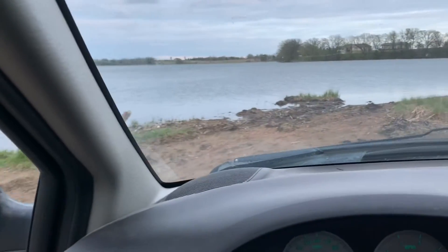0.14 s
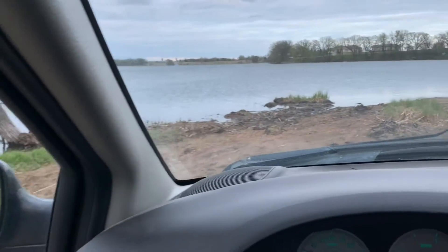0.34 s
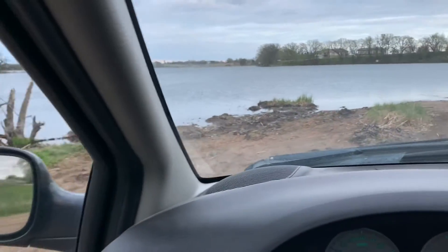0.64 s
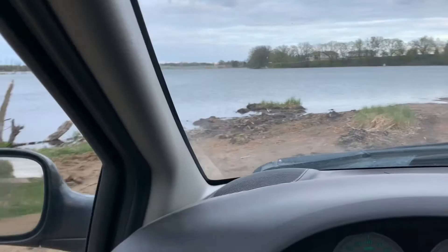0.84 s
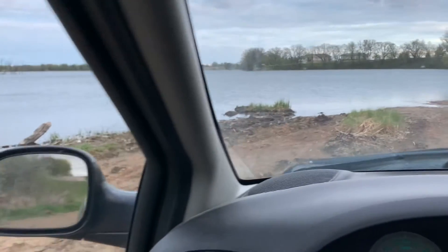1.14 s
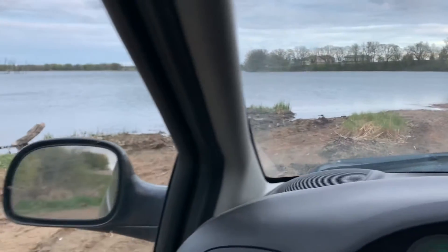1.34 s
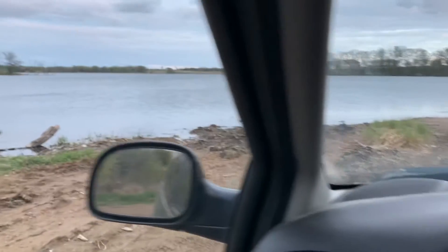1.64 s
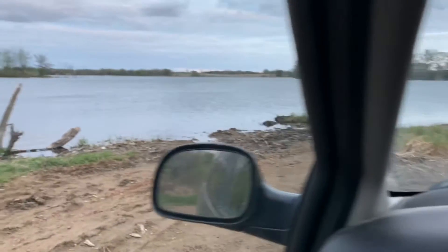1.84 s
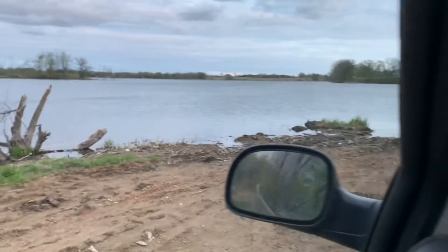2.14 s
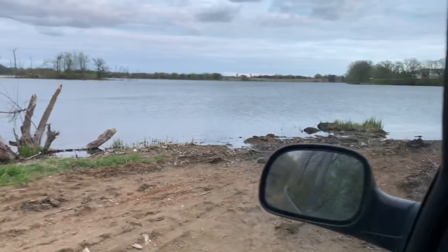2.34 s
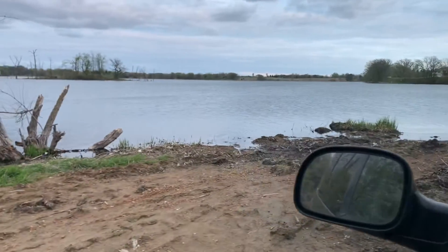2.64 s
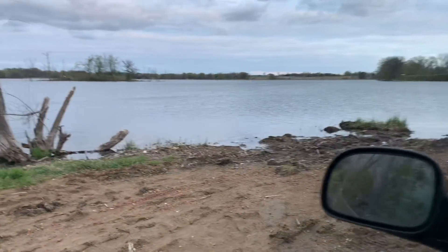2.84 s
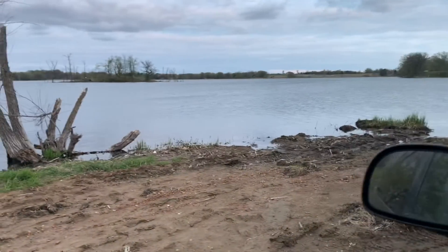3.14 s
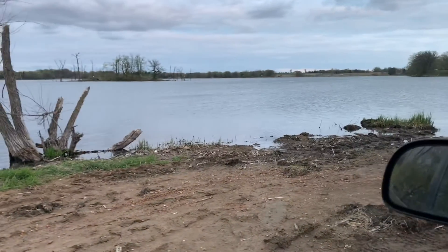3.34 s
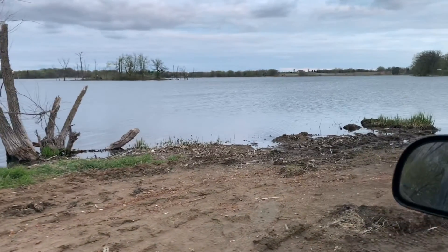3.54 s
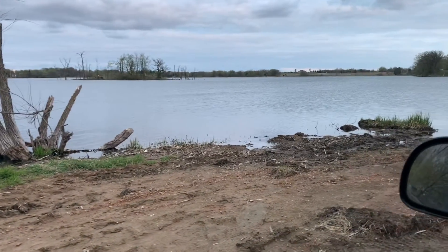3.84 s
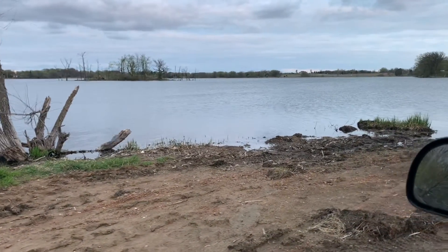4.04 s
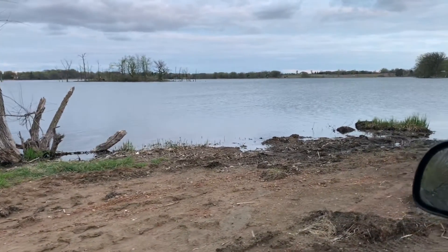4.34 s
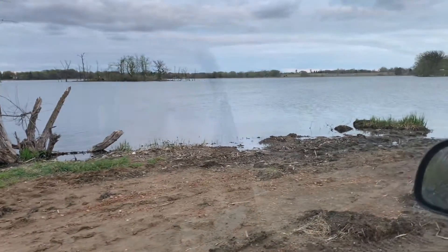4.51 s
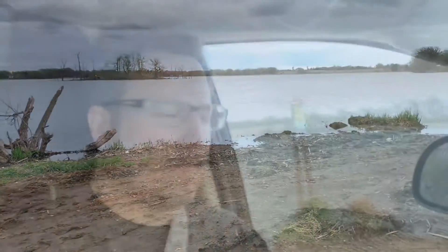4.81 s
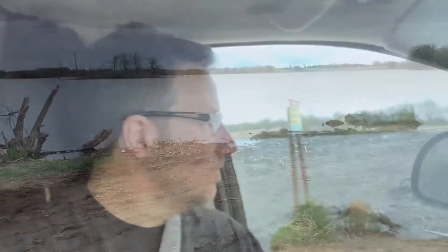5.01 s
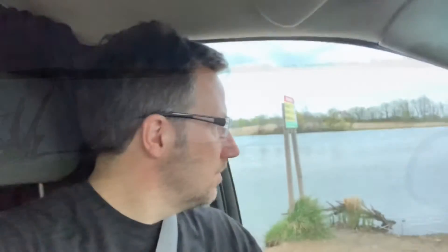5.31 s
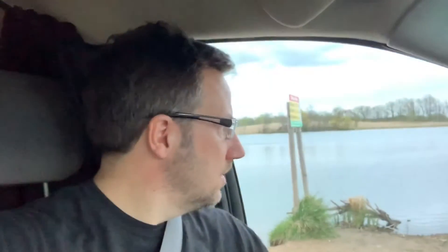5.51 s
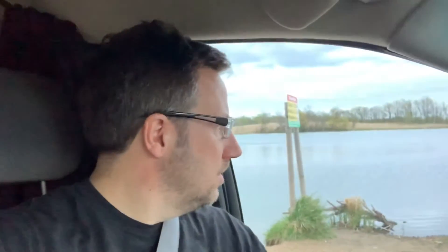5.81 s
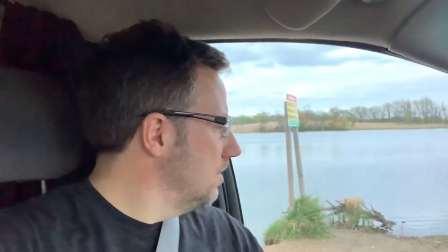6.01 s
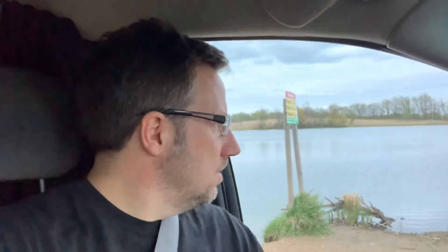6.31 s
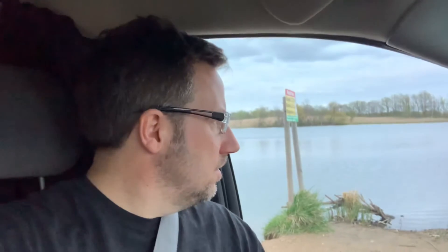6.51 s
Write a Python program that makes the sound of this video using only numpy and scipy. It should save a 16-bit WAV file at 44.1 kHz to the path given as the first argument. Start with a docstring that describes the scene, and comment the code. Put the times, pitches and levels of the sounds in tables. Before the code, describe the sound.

A low engine throb and muffled tyre crunch fill the cabin of a slowly rolling van, with dull knocks from ruts and small ticks of stones and fittings. A hand slides softly over the steering wheel several times. Near the end the driving dies away, leaving a faint hum, a soft rub, a single sharp plastic scrape and slow seat creaking, all heard from inside.

```python
"""Inside a minivan creeping over dirt and gravel. From the start the engine throbs, the tyres rumble and
crunch, and ruts knock the body and shake the trim. From about one second in, the steering wheel hisses through
the driver's palm in short strokes. Near five seconds the scene changes: the rumble fades out, a quiet hum
rises, and something soft brushes past. The seat starts to creak, hard plastic skids in one sharp scrape, and
the seat creaks slowly on to the end."""
import sys
import numpy as np
from scipy import signal
from scipy.fft import rfft, irfft, next_fast_len
from scipy.io import wavfile
from scipy.ndimage import uniform_filter1d

SR = 44100
rng = np.random.default_rng(int(sys.argv[2]) if len(sys.argv) > 2 else 0)


def dump(signal):
    """Clip the signal to [-1, 1] and save it as 16-bit WAV at the path in sys.argv[1]."""
    limited = np.clip(np.atleast_2d(signal).T, -1, 1)
    pcm = np.round(limited * 32767).astype(np.int16)
    wavfile.write(sys.argv[1], SR, pcm)


N = 293697
T = np.arange(N) / SR

# How loud the rolling is over time: time_s, rumble_db, crunch_db
ROLLING = [(0, -40, -59), (.9, -46.5, -58.5), (1.6, -41.5, -58.5), (2.5, -45, -58), (3.2, -43, -59),
           (3.6, -46, -60.5), (3.73, -40, -58), (4.05, -42.5, -61.5), (4.3, -41, -60.5),
           (4.95, -49.5, -66.5), (5.5, -70, -86)]
# Tone of the floor's rumble and of the dirt's crunch: pitch_hz, level_db
RUMBLE_TONE = [(28, -10.5), (40, 2.5), (65, 0), (95, -2.5), (125, -5), (168, -7), (215, -9), (250, -16.5),
               (286, -21), (335, -26), (450, -40)]
CRUNCH_TONE = [(280, 7.5), (400, 0), (520, -0.5), (650, -9.5), (770, -8), (1000, -16), (1400, -26),
               (2000, -34.5), (3000, -34.5), (5000, -42)]
def tyres(rumble_gain_db=3):
    """The ground shakes the floor; dirt grinds unevenly under the tread, muffled by the body."""
    rumble_db, crunch_db = curves(ROLLING)
    rumble = unit(colour(noise(), RUMBLE_TONE)) * undb(rumble_db + rumble_gain_db)
    dirt = grains(per_s=2500, spread_db=1.5)
    crunch = unit(colour(dirt, CRUNCH_TONE)) * undb(crunch_db + 2.4 * wander(26))
    return cabin(rumble + crunch) * during(ROLLING)


# How loud the gravel is next to the crunch: time_s, level_db
GRAVEL_LEVELS = [(0, -17.5), (.7, -12.5), (1.5, -18.5), (2.4, -17.5), (3.2, -13), (3.64, -17),
                 (3.71, -10.5), (3.86, -12), (4.1, -15.5), (4.6, -19), (5.4, -22)]
# How stones ring, from large to small: pitch_hz, width_hz, level_db
STONE_RINGS = [(520, 120, 4.5), (765, 130, 7), (960, 160, 2.5), (1170, 200, 0), (1530, 400, -9),
               (1950, 600, -11), (3300, 2200, -24.5)]
def gravel(patchy_db=3, gain_db=.5):
    """Stones of each size crack in uneven clusters; each crack is smeared on its way inside."""
    cracks = sum(ring(grains(per_s=220, spread_db=1.6) * undb(patchy_db * wander(14)), [stone])
                 for stone in STONE_RINGS)
    smeared = signal.fftconvolve(cracks, burst(.035, attack_s=.002, size=2048), axes=1)[:, :N]
    _, crunch_db = curves(ROLLING)
    level_db = crunch_db + curves(GRAVEL_LEVELS)[0] + gain_db
    return cabin(unit(soften(smeared, 4500))) * undb(level_db) * during(ROLLING)


# How fast and hard the engine fires: time_s, firing_hz, level_db
ENGINE_PULL = [(0, 35.23, -42.5), (.2, 34.8, -38), (.45, 36.48, -36), (.78, 37.77, -36), (1.15, 41.97, -37),
               (1.65, 41.8, -36), (2.2, 36.08, -47), (3.35, 35.27, -50), (3.85, 37.47, -43.5),
               (4.6, 39.02, -45), (5.1, 38.07, -52), (5.4, 37.5, -75)]
# Tones of the engine and of the steering pump: times_firing_rate, level_db
ENGINE_TONES = [(1, 1), (2, -10), (3, -17.5), (4, -17.5), (5, -30)]
PUMP_TONES = [(10, -4.5), (15, -12), (20, -19.5)]
# The cabin boosts a tone that glides through one of these: pitch_hz, width_hz, boost_db
CABIN_BOOSTS = [(110.4, 5.3, 8.5), (372.3, 22, 5), (598, 44, 7)]
def engine(gain_db=-2.5, lope_db=1.5, pump_db=-56.5, pump_ease_db_per_s=6.5, fan_db=-58, fan_hz=282.2):
    """Firings throb through the floor; the steering pump whines early, then the cooling fan."""
    firing_hz, level_db = curves(ENGINE_PULL)
    phase = 2 * np.pi * np.cumsum(firing_hz * (1 + .0025 * wander(9.2))) / SR

    def boost_db(k):
        return sum(db / (1 + (2 * (k * firing_hz - hz) / width) ** 2) for hz, width, db in CABIN_BOOSTS)

    throb = pump = 0
    for k, db in ENGINE_TONES:
        waver_db = 3 * (k > 1) * wander(8.8)  # only the overtones waver on their own
        throb += undb(db + boost_db(k) + waver_db) * np.sin(k * phase)
    for k, db in PUMP_TONES:
        pump += undb(db + boost_db(k) + 2 * wander(24)) * np.sin(k * phase + .22 * wander(40))
    pump *= undb(pump_db - pump_ease_db_per_s * T) * envelope(0, 1, hold_s=1.56, fade_s=1.1)
    fan_level = undb(fan_db + 1.6 * wander(13)) * envelope(1.937, attack_s=3.5, hold_s=2.7, fade_s=3.3)
    fan = fan_level * sine(fan_hz * (1 + .016 * wander(45)))
    throb *= undb(level_db + gain_db + lope_db * wander(11))
    return np.sqrt(2) * (throb + pan(1.3, .6) * (pump + fan)) * during(ENGINE_PULL)


# Jolts from ruts (a harder blow is brighter): start_s, panel_db, boom_db, boom_hz, hardness_hz
JOLTS = [(.224, -32, -27.5, 121, 604), (.274, -43, -32.5, 108, 180), (0.364, -29, -31, 134.6, 580),
         (1.109, -50, -33, 45.6, 300), (1.231, -33.5, -30, 132.7, 496), (1.611, -33.5, -26.5, 58.7, 199.2),
         (1.632, -42, -38, 91, 370), (1.764, -28, -28.5, 148, 520), (1.812, -34, -44, 148, 234),
         (1.983, -37.5, -34.5, 122.9, 350), (3.364, -44.5, -35, 102.4, 168),
         (3.682, -37.5, -29.5, 196, 287), (3.7, -35.5, -28.5, 84.4, 180), (3.738, -42, -34, 129.6, 220),
         (3.789, -41.5, -27, 72.5, 200.8), (3.867, -43, -27.5, 74.7, 200), (3.925, -48, -36, 101.4, 201.9)]
# How the door panels and the loose trim ring: pitch_hz, width_hz, level_db
PANEL_RINGS = [(126.7, 22.7, -0.5), (162, 38, 2), (224, 10, -16.5), (277.3, 25, 0), (336, 29, -12.5),
               (450, 52, -23), (479, 32, -23), (720, 520, -24)]
TRIM_RINGS = [(880, 90, -3.5), (993, 33, 10.5), (1306, 36, 7.5), (1548, 63, 3.5), (1805, 73, -0.5),
              (2146, 150, -7), (2680, 450, -18.5), (3360, 350, -15)]
def ruts(fade_s=.16, boom_cycles=9.9, sag_per_s=.46, rattle_db_per_octave=21.5):
    """Each jolt booms with a sagging pitch, rings the door panels on the left and rattles the trim."""
    booms, panels, trim = np.zeros((3, 2, N))
    t = np.arange(SR // 3) / SR
    for start_s, panel_db, boom_db, boom_hz, hardness_hz in JOLTS:
        push = soften(burst(fade_s, attack_s=.00601, snap=.2), hardness_hz, order=3)
        add(panels, start_s, ring(colour(push, [(100, 0), (900, 0)]), PANEL_RINGS), panel_db)
        chatter = soften(burst(.7 * fade_s, attack_s=.005), 2600, order=6)
        rattle_db = panel_db - 17 + rattle_db_per_octave * np.log2(hardness_hz / 612)
        add(trim, start_s, ring(chatter, TRIM_RINGS), rattle_db)
        swing = sine(boom_hz * np.exp(-sag_per_s * t)) * (1 - np.exp(-t / .019))
        dying = undb(-60 * t * boom_hz / boom_cycles)  # deeper booms ring longer
        add(booms, start_s, swing * dying, boom_db)
    return booms + cabin(trim) + pan(1.2, .8) * cabin(panels)


# Strokes of the palm, and the ring of the hollow of the hand: grip_s, fastest_s, lift_s, attack_s,
# level_db, treble_db, hollow_db, hollow_width_hz, hollow_at_grip_hz, hollow_at_lift_hz
PALM_STROKES = [(0.799, 1.37, 1.627, 0.05, -63.5, 2, -9.5, 200, 4470, 4890),
                (1.666, 1.767, 1.85, 0.15, -65.5, 1.5, -11, 250, 4770, 4510),
                (2.074, 2.203, 2.26, 0.4, -72.5, 1, -4, 400, 4760, 5380),
                (2.598, 2.838, 2.9, .15, -82.5, -2.5, 4, 1110, 3400, 4990),
                (3.022, 3.152, 3.09, 0.32, -74, 3, 1, 453, 6470, 6920),
                (3.15, 3.245, 3.27, 0.29, -69, 10.5, -2, 1300, 4600, 3400),
                (3.27, 3.295, 3.32, .1, -73.5, -5, 4, 800, 3500, 2094),
                (3.42, 3.458, 3.65, .18, -87.5, 0.5, -9.5, 354, 4480, 4464)]
# Tone of the palm's hiss and of its highest part: pitch_hz, level_db
PALM_TONE = [(1500, -3), (2050, -8), (2600, 1.5), (3700, 2), (4650, 6), (5500, 4), (6700, 8.5), (7600, 1),
             (8500, -2.5)]
PALM_TREBLE = [(6500, -20.5), (8000, -1.5), (8800, 1), (10200, 1), (11200, -2.5), (12200, 0), (13500, 2.5),
               (15600, -3.5)]
# Stereo width of the hiss before about five seconds, wide and narrow by turns: pitch_hz, side_minus_mid_db
EARLY_TREBLE_WIDTH = [(500, 2), (6800, -1.5), (7700, 1.5), (8600, 29), (9300, 4.5), (10000, -3),
                      (11000, -18), (12200, -2), (13400, 20), (14500, -1.5), (15800, -13.5)]
def steering(swell_db=6, ease_db=2.5, brighten_share=.65):
    """Skin slides over the wheel, louder and brighter with speed; the hollow hand rings and glides."""
    rub = unit(noise() + .41 * unit(grains(per_s=950, spread_db=0)))
    flutter_db = .8 * wander(40) + 1.8 * wander(320)
    body = unit(colour(rub, PALM_TONE)) * undb(flutter_db - 1)
    treble = unit(colour(rub, PALM_TREBLE)) * undb(flutter_db)
    skin = noise() * undb(3.5 * wander(25.27))
    out = np.zeros((2, N))
    for grip_s, fastest_s, lift_s, attack_s, level_db, treble_db, *hand in PALM_STROKES:
        hollow_db, width_hz, grip_hz, lift_hz = hand
        speed_db = np.interp(T, [grip_s, fastest_s, lift_s], [-swell_db, 0, -ease_db])
        hollow_hz = np.interp(T, [grip_s, lift_s], [grip_hz, lift_hz])
        hollow = unit(soften(skin, width_hz) * sine(hollow_hz)) * undb(hollow_db)
        hiss = body + hollow + treble * undb(treble_db + brighten_share * speed_db)
        out += hiss * undb(level_db + speed_db) * envelope(grip_s, attack_s, lift_s - grip_s, fade_s=.34)
    return spread(out, EARLY_TREBLE_WIDTH)


# Bright and hollow rings of the scraped plastic: pitch_hz, width_hz, level_db
BRIGHT_RINGS = [(3280, 60, -11.5), (3605, 37, -6), (4275, 45, -1.5), (4405, 45, -4.5), (4600, 50, 3),
                (4780, 55, -1), (4880, 65, 2), (5025, 55, 0), (5200, 90, -3), (5460, 48, 0),
                (5905, 56, 1.5), (6480, 80, -3.5), (6840, 100, -4.5), (7560, 120, -3)]
HOLLOW_RINGS = [(280, 35, 1.5), (555, 120, -12), (838, 70, -1.5), (999, 200, -8), (1332, 44, -2.5),
                (1570, 80, -4.5), (2147, 90, -3.5), (2360, 200, -6.5), (2740, 52, -1), (3000, 140, -5.5)]
# Tone of the fizz of rubbing: pitch_hz, level_db
FIZZ_TONE = [(2000, -1), (3500, -0.5), (7500, 1.5), (9200, 0.5), (10000, -6.5), (11000, 0), (12200, -5.5),
             (14500, -2), (15600, -4.5)]
# Lighter catches just before and after the main skid: peak_s, level_db, attack_s, hold_s, fade_s
SKID_CATCHES = [(5.444, -27, .028, .003, .04), (5.474, -9, .012, .002, .056)]
# Stereo width of the scrape, brush and hiss from about five seconds, widest near 9 kHz:
# pitch_hz, side_minus_mid_db
LATE_TREBLE_WIDTH = [(100, -5.5), (1000, -2), (4500, -1.5), (6500, 2.5), (7600, 6.5), (9400, 24),
                     (10700, 4), (12000, -7), (15800, -14)]
def scrape(peak_s=5.462, attack_s=.02, skid_db=-35, hollow_db=-46, hollow_lag_s=.008, tail_db=-66.5):
    """Hard plastic skids: tiny slips ring it brightly, then hollowly; the cabin adds a faint echo."""
    slips = noise() + .5 * unit(grains(per_s=3000, spread_db=2))
    bright = unit(ring(slips, BRIGHT_RINGS))
    fizz = unit(colour(slips, FIZZ_TONE))
    skid, late = (envelope(peak_s + lag, attack_s, hold_s=.006, fade_s=.055) for lag in (0, hollow_lag_s))
    catches = sum(undb(db) * envelope(s, *shape) for s, db, *shape in SKID_CATCHES)
    contact = (bright * (skid + catches) + undb(-2.5) * fizz * skid) * undb(skid_db)
    hollow = unit(ring(slips, HOLLOW_RINGS)) * late * undb(hollow_db)
    tail = unit(soften(fizz, 8000, order=1) + undb(-8) * bright)
    tail *= envelope(peak_s, attack_s, hold_s=0, fade_s=.34) * undb(tail_db)
    return spread(contact + hollow + tail, LATE_TREBLE_WIDTH)


# Slips that make up the seat's creak: start_s, level_db
SEAT_SLIPS = [(5.129, -64), (5.177, -63), (5.239, -62.5), (5.915, -55), (5.95, -60.5), (5.981, -60.5),
              (6.009, -59.5), (6.039, -59.5), (6.075, -59.5), (6.12, -59), (6.19, -57.5), (6.237, -59),
              (6.283, -57.5), (6.342, -58.5), (6.463, -57), (6.525, -58)]
# How the seat frame rings: pitch_hz, width_hz, level_db
SEAT_RINGS = [(760, 125, 10), (1040, 260, 2.5), (1380, 370, -7.5), (1844, 130, 0.5), (2190, 240, -9),
              (2620, 320, -13), (3170, 440, -17)]
def seat_creak(gain_db=-7, echo_s=.061):
    """The seat sticks and slips: single snaps ring its frame and scatter round the cabin."""
    out = np.zeros((2, N))
    for start_s, level_db in SEAT_SLIPS:
        slip = burst(echo_s, attack_s=.00084, snap=.47, size=4096)
        slip = colour(slip, [(550, .0063), (3500, .0046)])
        add(out, start_s, ring(slip, SEAT_RINGS), level_db + gain_db)
    return cabin(out)


# Small ticks of stones and fittings, and at 0.796 s the palm's sharp catch on the wheel as the first stroke
# begins: start_s, level_db, pitch_hz, fade_s, attack_s
TICKS = [(.160, -64.5, 2460, 0.065, 0.0014), (.166, -77.5, 4050, 0.035, .003),
         (0.206, -74.5, 3950, 0.037, 0.00194), (0.504, -65, 2770, 0.018, 0.00037),
         (.652, -59, 620, 0.033, 0.0012), (.774, -58.5, 1500, 0.06, 0.0015),
         (.776, -65.5, 2939, 0.08, 0.002), (0.796, -64, 6700, 0.02, 0.0005),
         (1.106, -52.5, 806, 0.045, 0.002), (1.884, -65, 1299, 0.033, .002),
         (2.022, -59.5, 1580, .025, .001), (2.021, -72, 2908, 0.048, .002),
         (3.193, -62, 985, 0.022, 0.0014), (4.029, -70, 2100, 0.056, 0.0024),
         (4.06, -54, 1790, 0.011, 0.00017), (4.061, -65.5, 4230, 0.0094, 0.00019),
         (4.743, -68, 5690, 0.043, 0.00039), (5.325, -61.5, 958, 0.082, 0.0006),
         (5.633, -79, 4660, 0.041, 0.0018), (5.66, -71.5, 1304, 0.047, 0.0019),
         (5.663, -79, 4740, 0.031, 0.0024)]
def clicks(gain_db=-1, width_share=.24):
    """Lone stones and loose fittings tick, each at its own pitch, and the palm catches once on the wheel;
    slower contacts snap less."""
    out = np.zeros((2, N))
    for start_s, level_db, pitch_hz, fade_s, attack_s in TICKS:
        snap = .5 * np.exp(-attack_s / .002)
        contact = soften(burst(fade_s, attack_s, snap, size=4096), 1.2 * pitch_hz)
        add(out, start_s, ring(contact, [(pitch_hz, pitch_hz * width_share, 0)]), level_db + gain_db)
    return cabin(out)


# How the brushed trim rings: pitch_hz, width_hz, level_db
BRUSH_RINGS = [(307, 67, 1), (454, 63, 4.5), (844, 100, 0.5), (1354, 52, 2), (2030, 490, -20),
               (4680, 150, -14.5)]
def brush(peak_s=4.99, level_db=-58, fizz_db=-13):
    """Something soft brushes the trim: a dull, hollow rub with a little fizz."""
    rub = unit(ring(noise(), BRUSH_RINGS)) + undb(fizz_db) * unit(colour(noise(), FIZZ_TONE))
    swell = envelope(peak_s, attack_s=.091, hold_s=.0087, fade_s=.077)
    return spread(rub, LATE_TREBLE_WIDTH) * undb(level_db) * swell


def trim_buzz(buzz_db=-73.5, full_pull_db=-31, uneven_db=3.5):
    """Loose trim chatters lightly, louder the harder the engine shakes it."""
    _, pull_db = curves(ENGINE_PULL)
    taps = colour(grains(per_s=1400, spread_db=.7), [(1150, .0026), (3800, 8)])
    level_db = buzz_db + pull_db - full_pull_db + uneven_db * wander(12)
    return cabin(unit(ring(taps, TRIM_RINGS))) * undb(level_db) * during(ENGINE_PULL)


# The quiet hum's tones, then the tone of the faint rumble and of the thin hiss: pitch_hz, level_db
HUM_TONES = [(86.1, -58.5), (258.4, -73), (430.7, -85)]
QUIET_RUMBLE_TONE = [(15, -48.5), (25, -19), (58, -5.5), (101, -8.5), (117, -5), (153, -18), (266, -18),
                     (562, -40.5), (2390, -51), (4940, -57.5), (8000, -66.5), (10400, -96.5), (17600, -120)]
HISS_TONE = [(3000, -1.5), (7000, 2.5), (9000, 2.5), (11000, 5), (14000, 1), (15500, -8)]
def quiet_hum(hum_gain_db=-1, rumble_db=-62, hiss_db=-88):
    """A wavering hum and faint rumble rise on the left as the rolling fades; hiss lies under it all."""
    rise = np.clip((T - 4.5) / .8, 0, 1)
    hum = 0
    for (hz, db), waver_db in zip(HUM_TONES, [.8, 3, 3]):
        level = np.sqrt(2) * undb(db + hum_gain_db + waver_db * wander(22))
        hum += level * np.sin(2 * np.pi * hz * T + .18 * waver_db * wander(25))
    rumble = cabin(unit(colour(noise(), QUIET_RUMBLE_TONE))) * undb(rumble_db)
    early = spread(unit(colour(noise(), HISS_TONE)), EARLY_TREBLE_WIDTH)
    late = spread(unit(colour(noise(), HISS_TONE)), LATE_TREBLE_WIDTH)
    hiss = (np.sqrt(1 - rise) * early + np.sqrt(rise) * late) * undb(hiss_db)
    return rise * (pan(1.35, .65) * hum + pan(1.15, .85) * rumble) + hiss


# How wide the cabin sounds between the ears: pitch_hz, side_minus_mid_db
CABIN_SPREAD = [(60, -11.5), (200, -15), (380, 1), (700, 0.5), (15000, 0)]
def cabin(pair):
    """Turn two unrelated signals into stereo: bass is alike in both ears, treble is all around."""
    side = colour(pair[1], CABIN_SPREAD)
    return np.array([pair[0] + side, pair[0] - side])


def spread(pair, widths):
    """Mix a mid (same in both ears) with a side (opposite in each), keeping each ear's level."""
    hz, db = np.transpose(widths)
    mid_db = 10 * np.log10(2 / (1 + undb(db) ** 2))
    mid = colour(pair[0], np.c_[hz, mid_db])
    side = colour(pair[1], np.c_[hz, mid_db + db])
    return np.array([mid + side, mid - side])


def pan(left, right):
    """A gain for each ear."""
    return np.array([[left], [right]])


def undb(db):
    """Turn decibels into a gain."""
    return 10 ** (np.asarray(db) / 20)


def unit(x):
    """Scale to an average (rms) level of 1."""
    return x / np.sqrt(np.mean(x ** 2) + 1e-30)


def curves(table):
    """Join a table's timed points with straight lines, one curve per value column."""
    times, *columns = np.transpose(table)
    return [np.interp(T, times, column) for column in columns]


def during(table, fade_s=.03):
    """1 from a table's first time to its last, fading to 0 outside."""
    return np.clip(1 + np.minimum(T - table[0][0], table[-1][0] - T) / fade_s, 0, 1)


def envelope(peak_s, attack_s, hold_s, fade_s):
    """Rise 60 dB per attack_s to full level at peak_s, hold, then fall 60 dB per fade_s."""
    return undb(-60 * (np.maximum(peak_s - T, 0) / attack_s + np.maximum(T - peak_s - hold_s, 0) / fade_s))


def wander(per_s):
    """A smooth random drift of size about 1, with per_s new values a second."""
    step = int(SR / per_s)
    held = np.repeat(rng.standard_normal(N // step + 1), step)
    return unit(uniform_filter1d(uniform_filter1d(held, step), step)[:N])


def sine(hz):
    """A pure tone that follows a changing pitch."""
    return np.sin(2 * np.pi * np.cumsum(hz) / SR)


def noise():
    """Two unrelated white noises."""
    return rng.standard_normal((2, N))


def grains(per_s, spread_db):
    """Two streams of tiny impacts; spread_db makes a few larger than the rest."""
    size = undb(spread_db * np.minimum(rng.exponential(size=(2, N)), 5))
    return noise() * size * (rng.random((2, N)) < per_s / SR)


def burst(fade_s, attack_s, snap=0., size=16384):
    """A cluster of small contacts that builds fast and dies away, with one hit of strength snap."""
    t = np.arange(size) / SR
    contacts = rng.standard_normal((2, size)) * (1 - np.exp(-t / attack_s)) * undb(-60 * t / fade_s)
    contacts[:, int(attack_s * SR)] += snap * np.sqrt(np.sum(contacts ** 2, axis=1))
    return contacts


def colour(x, tone):
    """Shape a sound by (pitch_hz, level_db) points, cutting steeply beyond the first and last."""
    length = x.shape[-1]
    bins = next_fast_len(length)
    f = np.fft.rfftfreq(length + 4096, 1 / SR)[-1] * np.linspace(0, 1, bins + 1) + 1e-3
    hz, db = np.transpose(tone)
    edges = np.minimum(1, np.minimum(f / hz[0], hz[-1] / f)) ** 4
    gain = edges * undb(np.interp(np.log(f), np.log(hz), db))
    return irfft(rfft(x, 2 * bins) * gain)[..., :length]


def ring(x, rings):
    """Make a sound ring at each (pitch_hz, width_hz, level_db); narrower rings last longer."""
    out = 0
    for k, (hz, width, db) in enumerate(rings):
        peak = signal.iirpeak(min(hz, SR * .45), hz / width, fs=SR)
        out += (-1) ** k * undb(db) * signal.lfilter(*peak, x)
    return out


def soften(x, hz, order=2):
    """Muffle everything above hz."""
    return signal.sosfilt(signal.butter(order, min(hz, SR * .45), fs=SR, output="sos"), x)


def add(out, start_s, x, level_db):
    """Mix in a short sound with its loudest moment at level_db."""
    i = int(start_s * SR)
    peak = np.sqrt(uniform_filter1d(x ** 2, 256).max(axis=-1, keepdims=True))
    out[:, i:i + x.shape[-1]] += (x * undb(level_db) / peak)[..., :N - i]


def scene():
    """Everything as heard from the driver's seat."""
    van = pan(.93, 1.07) * (engine() + tyres() + gravel() + trim_buzz() + ruts())
    return van + clicks() + steering() + seat_creak() + scrape() + brush() + quiet_hum()


def record(dry):
    """Cut the deepest bass and the very highest treble."""
    thin = signal.sosfilt(signal.butter(4, 24, "high", fs=SR, output="sos"), dry)
    return signal.sosfilt(signal.ellip(8, .2, 70, 15800, fs=SR, output="sos"), thin)


dry = scene()
out = record(dry)
dump(out)
```